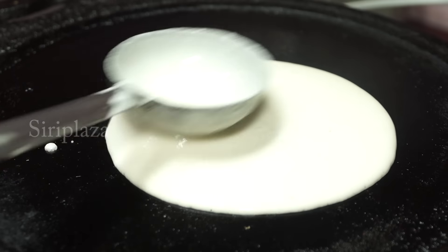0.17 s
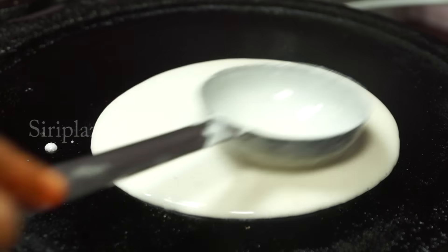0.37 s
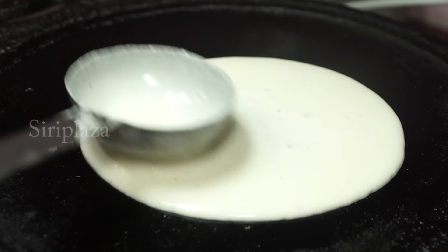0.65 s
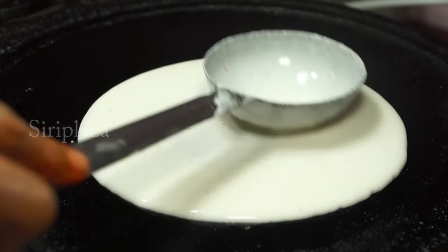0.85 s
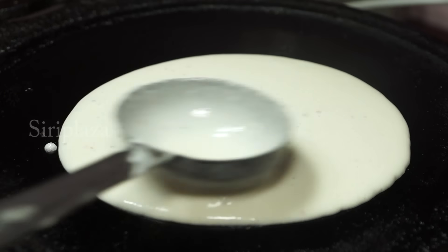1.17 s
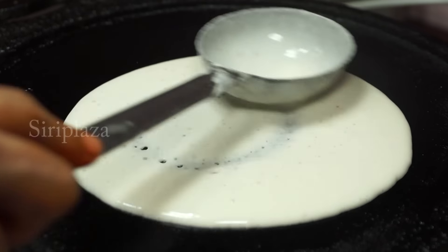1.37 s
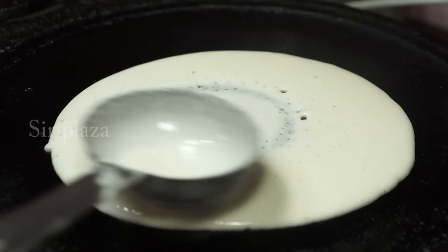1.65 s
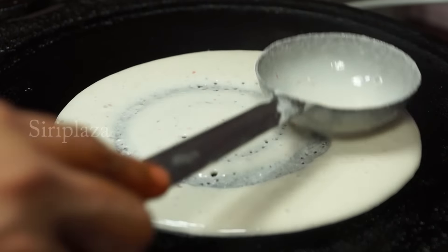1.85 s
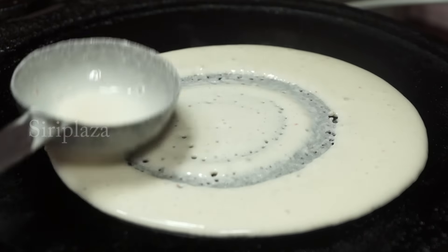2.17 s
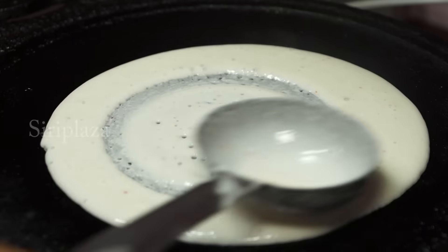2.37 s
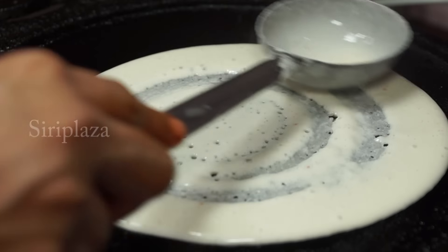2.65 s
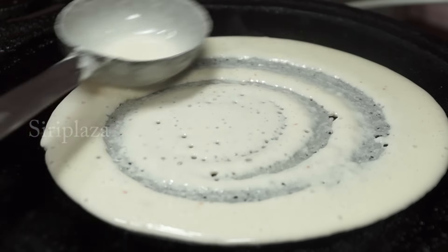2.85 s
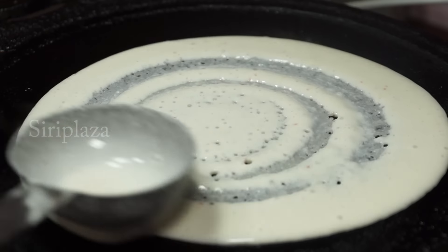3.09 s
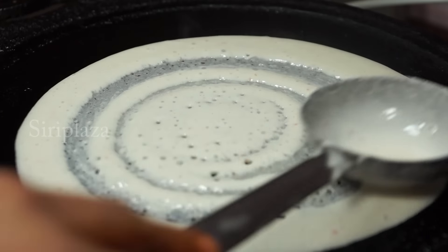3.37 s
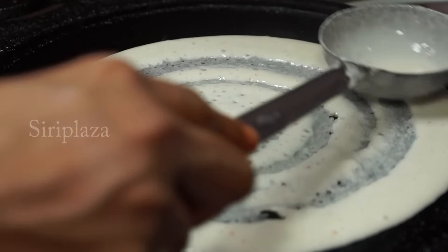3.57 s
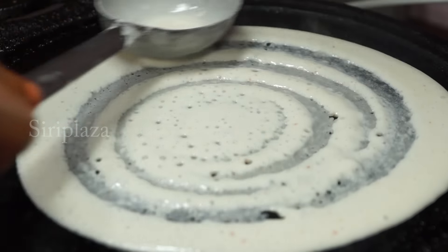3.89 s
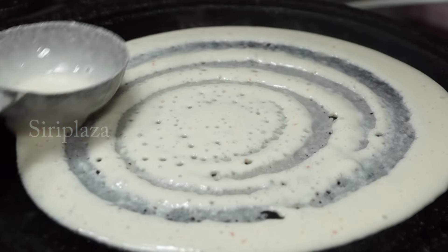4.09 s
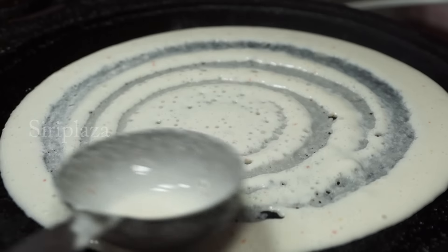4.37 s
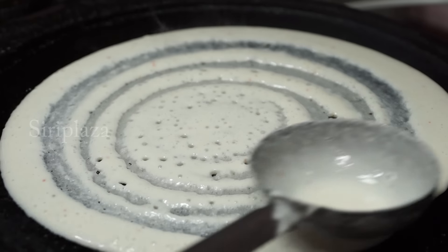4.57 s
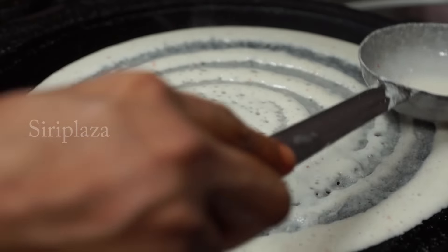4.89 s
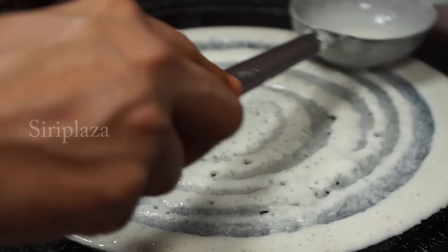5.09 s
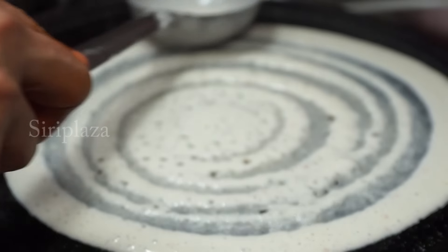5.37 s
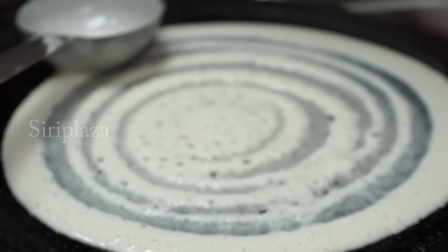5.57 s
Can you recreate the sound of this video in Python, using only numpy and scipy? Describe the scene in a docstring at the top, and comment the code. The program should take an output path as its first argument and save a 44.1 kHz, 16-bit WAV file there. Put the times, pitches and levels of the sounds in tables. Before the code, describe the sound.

A close stereo microphone hears batter frying on a flat pan, slightly left of centre. Continuous sizzle of countless tiny bubbles runs throughout, with short bursts of crackle and airy fizz as the ladle wipes. Larger bubbles pop irregularly, a few steam pockets squeak faintly. The dull simmer fades as the batter thins and late frying is softer; the room tail is short.

```python
"""A kitchen, with the microphone close to a hot flat pan on which a ladle spreads wet batter in circles.
Steam simmers under the thick batter and bursts out in countless tiny bubbles, each a short damped sine.
Where the ladle wipes the layer thin it crackles and fizzes, and blisters and tearing film snap as filtered clicks.
Larger bubbles pop as pressure spikes with a ringing cavity; a few pockets squeak as gliding narrow noise.
The ladle's rub and the stove's murmur are low filtered noise; the walls add a short tail."""
import sys
import numpy as np
from scipy import signal
from scipy.fft import rfft, irfft, next_fast_len
from scipy.io import wavfile
from scipy.ndimage import map_coordinates

SR = 44100
rng = np.random.default_rng(int(sys.argv[2]) if len(sys.argv) > 2 else 0)


def store_pcm(level_fs):
    """Save levels as 16-bit WAV."""
    pcm = np.round(np.clip(level_fs, -1, 1) * 32767).astype(np.int16)
    wavfile.write(sys.argv[1], SR, np.atleast_2d(pcm).T)


N = 252693  # length in samples


def amp(db):
    """Decibels to gain."""
    return 10 ** (np.asarray(db) / 20)


def unit(x):
    """Scale to rms 1."""
    return x / np.sqrt(np.mean(x ** 2) + 1e-20)


def along(points, hz):
    """Read (Hz, value) points on a log axis."""
    f, v = np.transpose(points)
    return np.interp(np.log(hz + 1), np.log(f + 1), v)


def curves(rows):
    """One value per sample for each column after the time."""
    s, *cols = np.transpose(rows)
    return [np.interp(np.arange(N) / SR, s, c) for c in cols]


def wobble(rate):
    """A smooth random curve, rate knots a second."""
    return map_coordinates(rng.standard_normal(4096), [np.arange(N) * rate / SR], mode="wrap")


def coloured(x, gain_db):
    """Causal (minimum-phase) filter whose gain in dB is a function of frequency."""
    size = 2 * next_fast_len(N // 2 + 8192)
    cepstrum = irfft(np.log(amp(gain_db(np.fft.rfftfreq(size, 1 / SR)))))
    # fold the cepstrum onto positive time, so that nothing sounds early
    cepstrum[1:size // 2] *= 2
    cepstrum[size // 2 + 1:] = 0
    response = np.exp(rfft(cepstrum))
    return irfft(rfft(x, size) * response)[..., :N]


def stereo(pair):
    """Middle and side sound reach the two microphone ports, whose likeness depends on pitch."""
    # Likeness of left and right. Each row: frequency in Hz, likeness from -1 (opposite) to 1 (same).
    likeness = [(30, -0.18), (120, 1), (260, 0.71), (520, 0.96), (3000, 0.96), (4500, 0.77), (6200, 0.61),
                (8600, 0.17), (11300, 0.05), (13500, -0.057), (16000, -0.74)]
    size = next_fast_len(N + 8192)
    alike = along(likeness, np.fft.rfftfreq(size, 1 / SR))
    turn = np.arccos(np.clip(alike, -.98, .98)) / 2
    mid, side = irfft(rfft(pair, size) * [np.cos(turn), 1j * np.sin(turn)], size)[:, :N]
    return np.array([mid + side, mid - side])


def bubbles(spectrum, pitch_hz, cycles, spread_db, count, size):
    """A stereo cloud of rms 1: count bursting bubbles, each a few cycles of a damped sine."""
    start = rng.integers(0, N, count)
    bore, strength, place = rng.standard_normal((count, 3)).T
    bubble_hz = pitch_hz * 2 ** (.7 * bore)
    phase = bubble_hz[:, None].clip(0, .47 * SR) * np.arange(size) / SR  # in cycles
    rings = np.sin(2 * np.pi * phase) * np.exp(-phase / cycles)
    # strengths vary, up to the largest bubble that the film can hold
    strength_gain = amp(spread_db * np.minimum(strength, 2.7))
    rings *= (strength_gain * rng.choice([-1, 1], count))[:, None]
    index = (start[:, None] + np.arange(size)).ravel()
    # each bubble sits left or right of the middle of the pan
    sides = (1, np.sign(place)[:, None])
    pair = np.array([np.bincount(index, (rings * w).ravel(), N)[:N] for w in sides])
    # undo the cloud's own spectrum, so that the wanted one remains
    f, power = signal.welch(pair[0], SR, nperseg=256, detrend=False)
    gain_db = lambda hz: along(spectrum, hz) - 10 * np.log10(np.interp(hz, f, power))
    return unit(stereo(coloured(pair, gain_db)))


def ticks(spectrum, spread_db, count):
    """Dry snaps in short trains, of nearly equal to moderately varied strength; rms 1."""
    snap_lag_s = .005  # mean delay of a snap after its train begins
    trains = rng.integers(0, N, count // 4)
    start = (rng.choice(trains, count) + SR * rng.exponential(snap_lag_s, count)).astype(int) % N
    size = amp(spread_db * np.minimum(rng.exponential(1, count), 3))
    sides = (1, rng.choice([-1, 1], count))
    pair = np.array([np.bincount(start, size * w, N) for w in sides])
    return unit(stereo(coloured(pair, lambda hz: along(spectrum, hz))))


def spread_out():
    """Share of the batter that lies as a thin sheet."""
    # The heap flattens into a sheet. Each row: time in seconds, share spread out (held within 0-1).
    spreading = [(0, 0.15), (1.1, 0.11), (2, 0.42), (3.2, 0.63), (5.73, 1.02)]
    return curves(spreading)[0].clip(0, 1)


def simmer():
    """Dull, crowded bubbling beneath the thick batter; it fades as the heap is spread out."""
    # Spectrum under thick batter. Each row: frequency in Hz, relative level in dB per Hz.
    thick_spectrum = [(30, -53), (100, -37), (170, -37.5), (330, -16), (450, -20), (560, -6), (1050, 0.5),
                      (1400, -4), (2200, -17), (5000, -34.5)]
    full_heap_db, sheet_loss = -37.5, 0.89  # level under the full heap; share of power lost in the sheet
    thick = np.sqrt(np.clip(1 - sheet_loss * spread_out(), 0, 1))
    cloud = bubbles(thick_spectrum, pitch_hz=977, cycles=3.0, spread_db=1, count=9000, size=300)
    return amp(full_heap_db) * thick * cloud


def flares():
    """Power of the crackle and of the fizz from the wiped patches: attack, hold, release."""
    # The ladle wipes a patch thin and it flares up.
    # Each row: start in seconds, length in seconds, crackle in dB, fizz in dB, both before the frying's mix.
    wipes = [(0.068, .015, -40, -44), (0.217, .012, -48, -42), (0.445, 0.015, -36, -42),
             (0.49, 0.056, -34.5, -47), (0.984, 0.021, -49, -39), (1.118, 0.045, -53, -39),
             (1.333, 0.025, -39, -38), (1.41, 0.033, -50, -44), (1.622, 0.02, -52, -37.5),
             (1.777, 0.11, -32, -39), (1.906, 0.045, -30.5, -40), (2.042, 0.19, -31.5, -45),
             (2.38, 0.018, -40, -36), (2.46, .08, -33, -40), (2.611, 0.096, -29, -52),
             (2.728, 0.034, -31, -43), (2.804, .016, -32, -41), (2.893, 0.072, -29, -47),
             (3.108, 0.22, -43, -38), (3.549, 0.024, -30.5, -37), (3.724, 0.095, -32, -54),
             (3.885, 0.069, -31.5, -40), (4.095, 0.18, -34.5, -41), (4.38, 0.088, -37, -45),
             (4.552, 0.048, -33.5, -39), (4.772, 0.019, -41, -48), (5.1, 0.052, -35, -39),
             (5.202, .015, -37, -46), (5.303, .015, -46, -40), (5.348, 0.019, -31, -40),
             (5.45, .015, -39, -40), (5.619, 0.012, -35, -38)]
    attack_s, release_s = 0.0073, 0.053  # rises while the ladle scrapes, then dies away
    t = np.arange(N) / SR
    power = np.zeros((2, N))
    for s, length, crackle_db, fizz_db in wipes:
        attack = np.clip((t - s) / attack_s, 0, 1)
        release = np.exp(-np.maximum(t - s - length, 0) / release_s)
        power += np.outer(amp([crackle_db, fizz_db]), attack * release) ** 2
    return power


def puffs(count):
    """Gain of steam that escapes in puffs, each starting at once and dying away; rms 1."""
    puff_share, puff_s = 0.32, 0.018  # share of the steam's power in puffs; decay time of a puff
    starts = np.bincount(rng.integers(0, N, count), rng.uniform(.3, 1, count), N)
    power = signal.lfilter([1], [1, -np.exp(-1 / (puff_s * SR))], starts)
    share = np.clip(puff_share, 0, 1)
    return np.sqrt(1 - share + share * power / power.mean())


def frying():
    """Bubbles break the surface: heap and sheet sizzle in different colours; crackle grows as batter spreads."""
    # Uneven frying: sizzle and fizz rise and dip from moment to moment, and the sizzle is weaker late.
    # Each row: time in seconds, sizzle in dB, fizz in dB, both before the mix below.
    uneven = [(0, -30, -40.5), (.3, -30, -45), (.45, -30.5, -40), (.7, -29.5, -46.5), (1.15, -29, -43.5),
              (1.45, -30, -37), (1.72, -30, -45), (2.05, -29.5, -34.5), (2.5, -30, -37.5),
              (2.6, -29.5, -40), (2.78, -30, -36.5), (2.85, -31, -34.5), (3.0, -28.5, -34.5),
              (3.42, -28.5, -38), (3.52, -30.5, -40), (3.9, -29.5, -36.5), (4.03, -32.5, -38.5),
              (4.4, -32.5, -37), (4.52, -34, -39), (4.68, -31, -37), (4.83, -35, -40), (5.0, -34.5, -41),
              (5.08, -37, -44), (5.19, -34.5, -45), (5.26, -38.5, -43), (5.3, -35.5, -42),
              (5.41, -39.5, -44), (5.5, -35, -46), (5.58, -35.5, -43), (5.69, -38.5, -44.5),
              (5.72, -34, -42)]
    # Spectra of heap, sheet, thin film, steam, tearing film and blisters.
    # Each row: frequency in Hz, relative level in dB per Hz.
    heap_spectrum = [(40, -71), (200, -34), (800, -17), (1400, -7), (1900, -3), (2800, -4.5), (3800, -5.5),
                     (5000, -11.5), (8000, -15.5), (16000, -51)]
    sheet_spectrum = [(40, -88), (200, -28), (850, -19.5), (1400, 2.5), (2000, 1.5), (2900, 2),
                      (3800, -0.5), (5000, -15.5), (8000, -23), (16000, -33)]
    thin_spectrum = [(40, -57), (300, -39.5), (1500, -3.5), (3000, -4), (4500, -2), (6600, -3.5),
                     (8300, -11.5), (12000, -15.5), (16000, -5)]
    steam_spectrum = [(1500, -29), (5000, -7), (8000, -1), (10000, 1), (13000, 1), (16000, 2.5)]
    snap_spectrum = [(40, -60), (200, -43), (700, -11.5), (1500, -1.5), (3000, 2.5), (6500, 4),
                     (9000, -5.5), (16000, -4)]
    blister_spectrum = [(40, -66), (200, -38), (800, -20), (1500, -6.5), (2300, -2), (2900, 2.5),
                        (4200, 1.5), (7000, -4.5), (10000, -8), (16000, -18)]
    wipe_sizzle_db = -24  # sizzle that a flare adds, against its crackle
    crackle_db, crackle_grows_db = -6, 4  # crackle against sizzle on the heap; its gain in the full sheet
    surge_db, surges_per_s = 0.2, 26  # the level of the frying sways very slightly

    sizzle_db, fizz_db = curves(uneven)
    spread = spread_out()
    crackle_flare, fizz_flare = flares()
    sizzling = np.sqrt(amp(sizzle_db) ** 2 + amp(wipe_sizzle_db) ** 2 * crackle_flare)
    base_crackle = amp(sizzle_db + crackle_db + crackle_grows_db * spread)
    crackling = np.sqrt(base_crackle ** 2 + crackle_flare)
    fizzing = np.sqrt(amp(fizz_db) ** 2 + fizz_flare) * puffs(count=330)

    heap = bubbles(heap_spectrum, pitch_hz=2610, cycles=1.03, spread_db=1.5, count=18000, size=80)
    sheet = bubbles(sheet_spectrum, pitch_hz=2320, cycles=0.82, spread_db=2.0, count=20000, size=80)
    sizzle = amp(-1.5) * sizzling * (np.sqrt(1 - spread) * heap + np.sqrt(spread) * sheet)
    film = bubbles(thin_spectrum, pitch_hz=4900, cycles=0.47, spread_db=2.0, count=20000, size=36)
    crackle = crackling * film
    # faint, longer ringing grains around 6 kHz within the crackle
    long_grains = bubbles(thin_spectrum, pitch_hz=5810, cycles=17, spread_db=3.0, count=2200, size=600)
    ringing = amp(-9.0) * crackling * long_grains
    steam = bubbles(steam_spectrum, pitch_hz=10600, cycles=0.56, spread_db=1.0, count=70000, size=20)
    fizz = amp(5.5) * fizzing * steam
    # the film tears loudest where the crackle is strong
    tearing = amp(-5.0) * crackling * ticks(snap_spectrum, spread_db=0.5, count=1300)
    # small blisters snap all over the batter, duller than the thin film
    blisters = amp(-7.5) * sizzling * ticks(blister_spectrum, spread_db=2.1, count=2200)
    surge = amp(surge_db * wobble(surges_per_s))
    return surge * (sizzle + crackle + ringing + fizz + tearing + blisters)


def rubbing():
    """The ladle's base makes a dull rub on the coated pan: filtered noise under uneven pressure."""
    # Strength of the rub. Each row: time in seconds, level in dB before the sway.
    rub = [(0, -58.5), (1.2, -54.5), (2, -57), (3.6, -55.5), (3.9, -52.5), (4.2, -53), (4.65, -53),
           (5, -56.5), (5.4, -56), (5.73, -56)]
    # Spectrum of the rub. Each row: frequency in Hz, relative level in dB per Hz.
    drag_spectrum = [(40, -28), (150, -16.5), (290, -3), (420, 1.5), (580, 2), (900, -15.5), (2000, -44)]
    sway_db, sways_per_s = 2.6, 6.4  # the ladle's uneven pressure
    rub_db = curves(rub)[0] + sway_db * wobble(sways_per_s)
    noise = coloured(rng.standard_normal((2, N)), lambda hz: along(drag_spectrum, hz))
    return amp(rub_db) * unit(stereo(noise))


def stove():
    """The low, steady murmur of the stove: noise that is strongest below 1 kHz."""
    # Spectrum of the murmur. Each row: frequency in Hz, relative level in dB per Hz.
    murmur_spectrum = [(20, -7), (55, -20), (75, -11), (95, 2), (120, -14.5), (200, 8), (300, -1), (600, 3),
                       (2000, -46)]
    noise = coloured(rng.standard_normal((2, N)), lambda hz: along(murmur_spectrum, hz))
    return amp(-65.0) * unit(stereo(noise))


def droplets(count):
    """Rows (delay s, size dB) of the spray from one pop: the droplets land one after another."""
    mean_gap_s = 0.0047
    delays = np.cumsum(mean_gap_s * rng.uniform(.3, 1.7, count))
    return zip(delays, rng.normal(0, 2, count))


def pops():
    """A large bubble tears with a sharp pressure spike and its cavity rings; flung droplets spit just after."""
    # The largest bubbles that burst. Each row: start in seconds, peak in dB before stereo and resonances,
    # brightness of the snap in Hz, cavity pitch in Hz, share of ring from 0 to 1.
    bursts = [(0.0355, -15, 3200, 2900, 0.8), (0.0762, -13.5, 5000.0, 2500.0, 0.9),
              (0.236, -12.9, 3200.0, 2000.0, 0.3), (0.2465, -15.5, 4000, 3300, 0.8),
              (0.3318, -14, 4000, 3800, 0.6), (0.3376, -14.5, 4000.0, 5300.0, 1.0),
              (0.393, -15, 5000, 3500, 0.6), (0.6927, -12.2, 2500.0, 3300.0, 0.9),
              (0.712, -15, 3200, 2900, 0.6), (0.7567, -12.4, 3200.0, 2900.0, 0.15),
              (1.0898, -11.5, 3200.0, 2500.0, 0.5), (1.2258, -14.5, 4000, 2800, 0.5),
              (1.2368, -15.3, 2500.0, 3800.0, 0.7), (1.3845, -15.5, 4000, 2700, 0.5),
              (1.4263, -15.3, 2500.0, 1600.0, 0.5), (1.493, -14.5, 3200, 2200, 0.5),
              (1.6327, -9.9, 8000.0, 1600.0, 0.5), (1.829, -10.5, 4000.0, 4500.0, 0.3),
              (1.929, -9.6, 5000.0, 4500.0, 0.3), (1.9479, -12.4, 4000.0, 3300.0, 0.3),
              (2.0139, -7.7, 3200.0, 2900.0, 0.3), (2.1883, -10.6, 5000.0, 2000.0, 0.5),
              (2.3944, -12.0, 5000.0, 1600.0, 0.9), (2.5263, -12.2, 5000.0, 1600.0, 0.5),
              (2.6312, -10.1, 8000.0, 1600.0, 0.5), (2.6659, -9.5, 6500.0, 2900.0, 0.9),
              (2.6717, -8.7, 6500.0, 2900.0, 0.9), (2.6764, -11.1, 4000.0, 3300.0, 0.3),
              (2.7003, -12.4, 5000.0, 2500.0, 0.9), (2.8106, -13.4, 4000.0, 4500.0, 0.7),
              (2.8194, -10.9, 6500.0, 3300.0, 0.9), (2.9017, -10.8, 5000.0, 3300.0, 0.3),
              (3.2542, -9.5, 8000.0, 1600.0, 0.9), (3.2712, -12.3, 3200.0, 2900.0, 0.3),
              (3.459, -8.2, 6500.0, 2000.0, 0.15), (3.5592, -11.9, 2500.0, 4500.0, 0.7),
              (3.565, -11.5, 4000.0, 1600.0, 0.15), (3.7015, -12.6, 5000.0, 3800.0, 0.15),
              (3.818, -11.1, 5000.0, 1600.0, 0.3), (4.0645, -12.0, 6500.0, 2900.0, 0.5),
              (4.1698, -14.8, 4000.0, 2000.0, 0.5), (4.3145, -14.0, 3200.0, 3800.0, 0.3),
              (4.3602, -14.6, 3200.0, 2000.0, 0.5), (4.4257, -10.9, 8000.0, 2900.0, 0.5),
              (4.8087, -13.2, 5000.0, 1600.0, 0.3), (4.8497, -12.1, 8000.0, 2000.0, 0.7),
              (4.9028, -16.0, 10000.0, 4500.0, 0.3), (4.9596, -18.1, 5000.0, 2900.0, 0.5),
              (5.1012, -14.6, 5000.0, 2900.0, 0.15), (5.1201, -13.7, 6500.0, 2500.0, 0.5),
              (5.1483, -16.3, 5000.0, 2900.0, 0.5), (5.206, -16.3, 4000.0, 2500.0, 0.3),
              (5.2631, -15.3, 6500.0, 2900.0, 0.9), (5.2826, -18.6, 3200.0, 3300.0, 0.3),
              (5.3168, -14.6, 6500.0, 2900.0, 0.15), (5.3573, -17, 6500, 6000, 0.6),
              (5.362, -17, 4000, 3000, 0.9), (5.3659, -13.8, 4000.0, 2500.0, 0.3),
              (5.3789, -12.7, 10000.0, 3800.0, 0.7), (5.4481, -14.5, 8000.0, 2900.0, 0.7),
              (5.4621, -14.9, 10000.0, 2500.0, 0.9), (5.5093, -17.4, 4000.0, 2900.0, 0.5),
              (5.6093, -15.0, 8000.0, 3300.0, 0.5), (5.6146, -12, 5000, 4100, 0.9),
              (5.6167, -8, 4500, 3300, 0.3), (5.6427, -16.4, 3200.0, 3300.0, 0.7),
              (5.7177, -15.9, 5000.0, 2000.0, 0.7)]
    cavity_q, side = 3.2, .7  # sharpness of the cavity's ring; how far off centre the pops lie
    droplet_db = -22  # spit of a landing droplet against its pop
    t = np.arange(SR // 100) / SR - .001  # the spike peaks at t = 0

    def spike(hz):
        """Pressure pulse with a dip on either side."""
        bell = (np.pi * hz * t) ** 2
        return (1 - 2 * bell) * np.exp(-bell)

    out = np.zeros((2, N + SR))
    for s, db, snap_hz, cavity_hz, ring in bursts:
        snap = spike(snap_hz)
        cavity = signal.lfilter(*signal.iirpeak(min(cavity_hz, SR / 4), cavity_q, fs=SR), snap)
        ring = np.clip(ring, 0, 1)
        pop = (1 - ring) * snap + ring * cavity / abs(cavity).max()
        sounds = [(s, db, pop / abs(pop).max())]
        sounds += [(s + lag, db + droplet_db + size, snap) for lag, size in droplets(count=3)]
        for at, level, wave in sounds:
            first = max(round((at + t[0]) * SR), 0)
            place = [1, side * rng.choice([-1, 1])]
            out[:, first:][:, :len(t)] += amp(level) * np.outer(place, wave)
    return stereo(out[:, :N])


def squeaks():
    """Steam forced through a wet slit sputters at a gliding pitch: a narrow slit squeaks, a wide one hisses."""
    # Steam squeezing out of a pocket. Each row: start in seconds, length in seconds, start pitch in Hz,
    # end pitch in Hz, width in Hz (knots of noise per second), level in dB before stereo and resonances.
    pockets = [(0.325, 0.025, 5000, 5250, 700, -32), (.435, .07, 15200, 15250, 200, -43),
               (0.237, 0.25, 3960, 3880, 900, -36), (0.53, 0.37, 2655, 3290, 1298, -35.5),
               (1.045, 0.43, 2725, 2695, 700, -40.5), (1.04, .06, 1058, 950, 300, -41),
               (1.949, 0.077, 1078, 1017, 200.8, -36.5), (2.572, .03, 2620, 2430, 400, -36),
               (2.888, .08, 6030, 5700, 700, -36), (2.961, 0.092, 2005, 1250, 302, -37),
               (3.099, 0.12, 2860, 3050, 800, -34), (3.3, 0.16, 2960, 2970, 700, -38),
               (4.22, 0.18, 4130, 3830, 800, -38), (4.403, 0.04, 1700, 1530, 110, -31),
               (4.432, .054, 1570, 1470, 130, -37), (4.45, .04, 1750, 2000, 300, -39),
               (4.706, .02, 1950, 2050, 300, -40), (5.63, 0.061, 3600, 3300, 1415, -36)]
    out = np.zeros((2, N))
    t = np.arange(N) / SR
    sputter = amp(1.7 * wobble(200))
    for s, length, start_hz, end_hz, width_hz, db in pockets:
        u = np.clip((t - s) / length, 0, 1)
        swell = np.sin(np.pi * u)
        phase = 2 * np.pi * np.cumsum(start_hz + (end_hz - start_hz) * u) / SR
        # two slow noises on a cosine and a sine make a band of noise around the pitch
        band = wobble(width_hz) * np.cos(phase) + wobble(width_hz) * np.sin(phase)
        jet = unit(swell * sputter * band) * np.sqrt(np.mean(swell ** 2))
        out += amp(db) * np.outer([1, rng.choice([-1, 1])], jet)
    return stereo(out)


def kitchen(x, count=6):
    """The walls answer with a short tail whose treble dies first; it keeps changing as hand and ladle move."""
    # Decay of the room. Each row: frequency in Hz, time in seconds to fall by 60 dB.
    decay = [(200, 0.54), (2000, 0.2), (12000, 0.031)]
    out = np.zeros((2, N))
    for k in range(count):
        hz, t, z = signal.stft(rng.standard_normal((2, SR // 3)), SR, nperseg=256)
        fade = amp(-60 * t / along(decay, hz)[:, None])
        tail = signal.istft(z * fade, SR, nperseg=256)[1]
        tail = np.pad(tail, ((0, 0), (SR // 250, 0)))  # the walls answer 4 ms late
        # each tail takes its turn and blends into the next
        share = np.maximum(1 - abs(np.linspace(0, count - 1, N) - k), 0)
        out += signal.fftconvolve(x * np.sqrt(share), tail / np.linalg.norm(tail[0]), axes=1)[:, :N]
    return out


def nook(x):
    """Resonances of pan and nook shift in strength as the heap of batter becomes a sheet."""
    # Resonances and hollows of the pan and the nook around it.
    # Each row: centre in Hz, width in Hz, gain in dB with the heap, gain in dB with the sheet.
    resonances = [(98, 10, -2, -3), (144, 19, 7, 9), (161, 14, -6, -6), (210, 70, 4.5, 4),
                  (298, 30, 3, 2.5), (323, 24, -2, -3.5), (548, 34, 5.5, 1), (585, 23, -7, -5),
                  (624, 30, 2, 1), (676, 41, -6.5, -0.5), (757, 43, 2, 2.5), (790, 45, -4, -2.5),
                  (913, 20, 4, 2.5), (1152, 60, 4, 3), (1230, 70, -2, -1.5), (1352, 47, 3, 3),
                  (1660, 27, -2, -.5), (1900, 97, 2, 2.5), (2225, 41, 2, 4), (2554, 49, 4.5, 1),
                  (2840, 180, 2.5, 1.5)]
    centre, width, heap_db, sheet_db = np.transpose(resonances)

    def under(gains_db):
        """Add up the bell-shaped gains in dB and filter with them."""
        bells = lambda hz: np.exp(-2 * np.minimum(((hz[:, None] - centre) / width) ** 2, 20))
        return coloured(x, lambda hz: bells(hz) @ gains_db)

    spread = spread_out()
    return (1 - spread) * under(heap_db) + spread * under(sheet_db)


def scene():
    """Everything on the pan, with the room, coloured by the nook; the pan lies a little to the left."""
    pan = simmer() + frying() + rubbing() + pops() + squeaks()
    around_pan = pan + amp(-13) * kitchen(pan) + stove()
    return amp([[.25], [-.25]]) * nook(around_pan)


def record(dry):
    """The microphone's path keeps nothing from its band limit upward."""
    top_hz = 16000
    size = next_fast_len(N + 8192)
    return irfft(rfft(dry, size) * (np.fft.rfftfreq(size, 1 / SR) < top_hz), size)[:, :N]


dry = scene()
out = record(dry)
store_pcm(out)
```